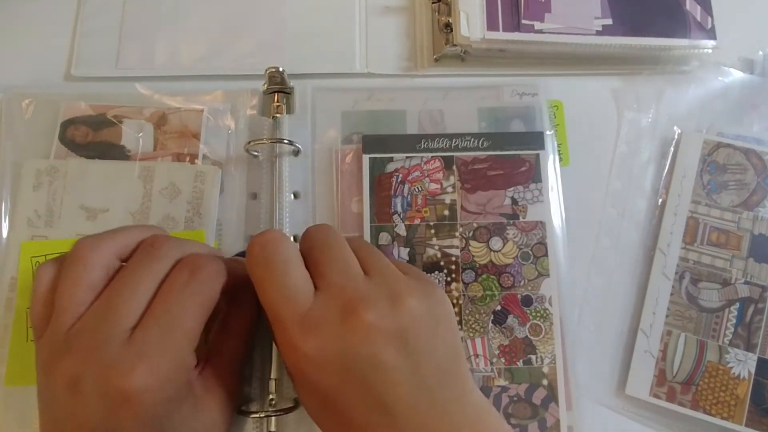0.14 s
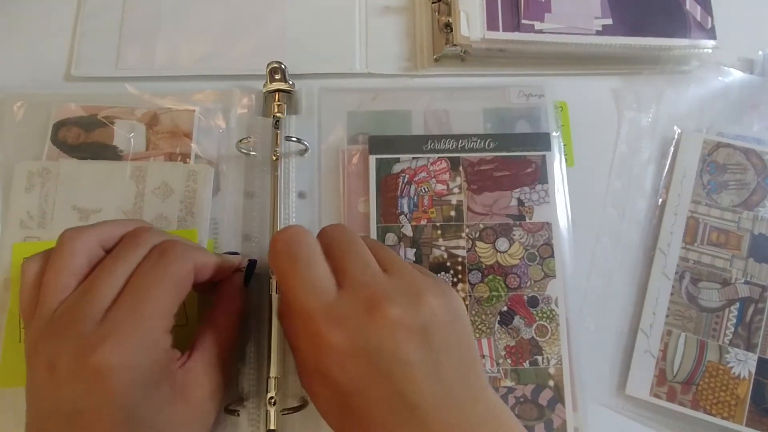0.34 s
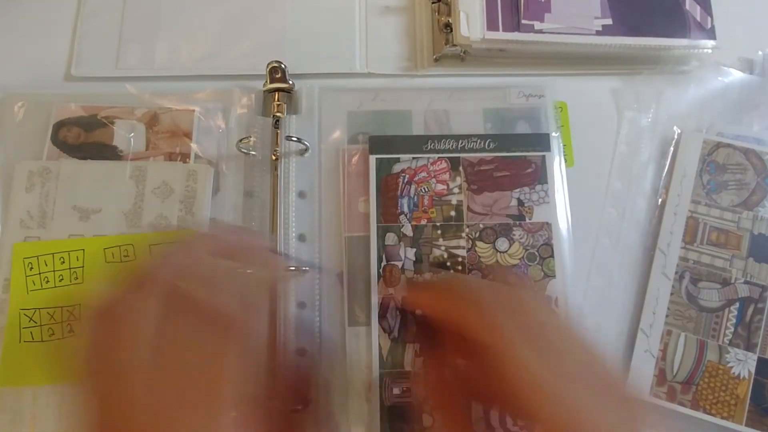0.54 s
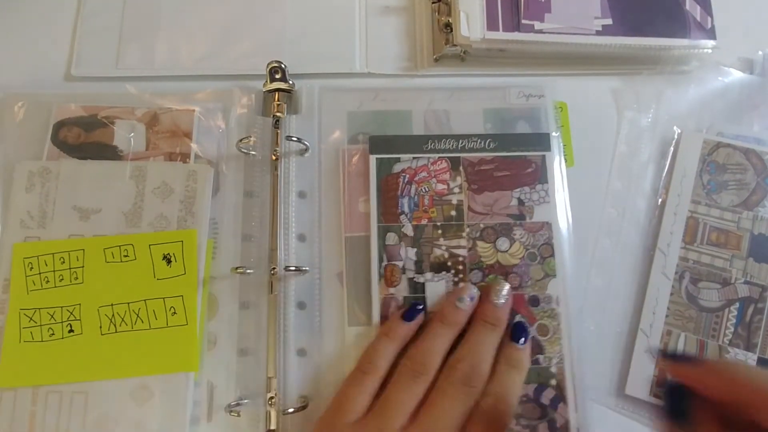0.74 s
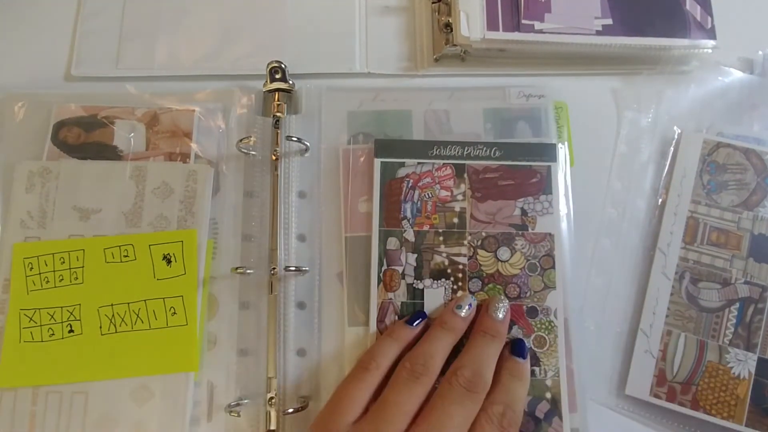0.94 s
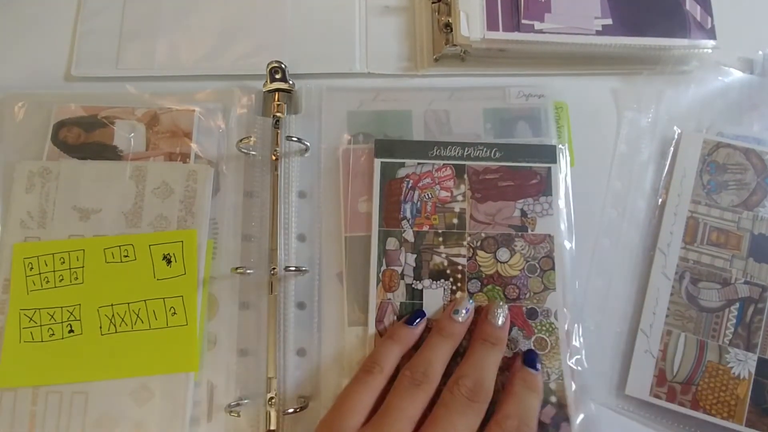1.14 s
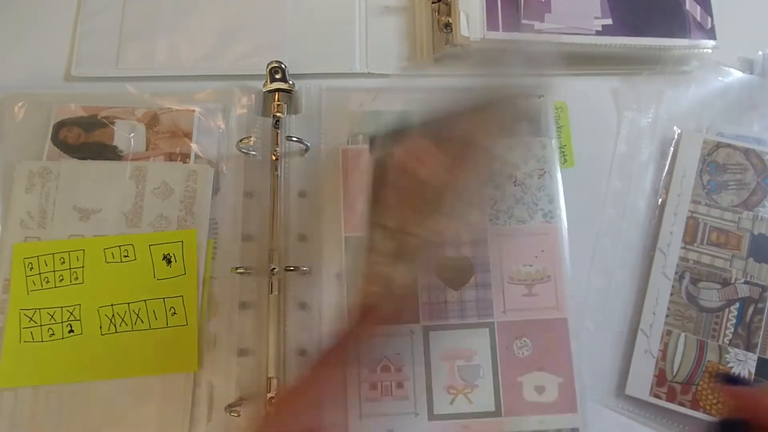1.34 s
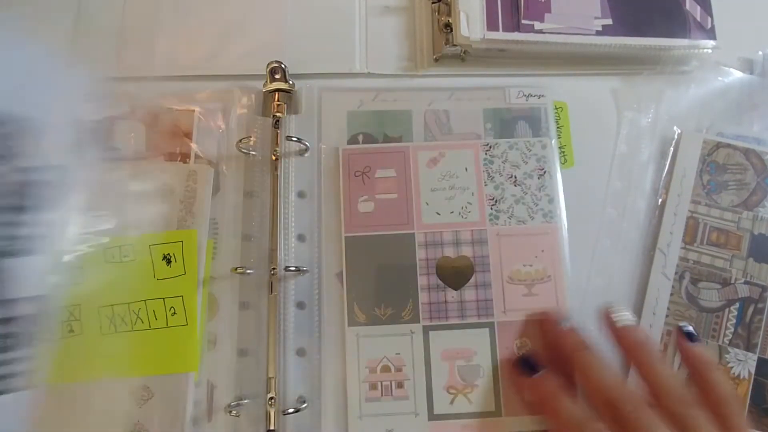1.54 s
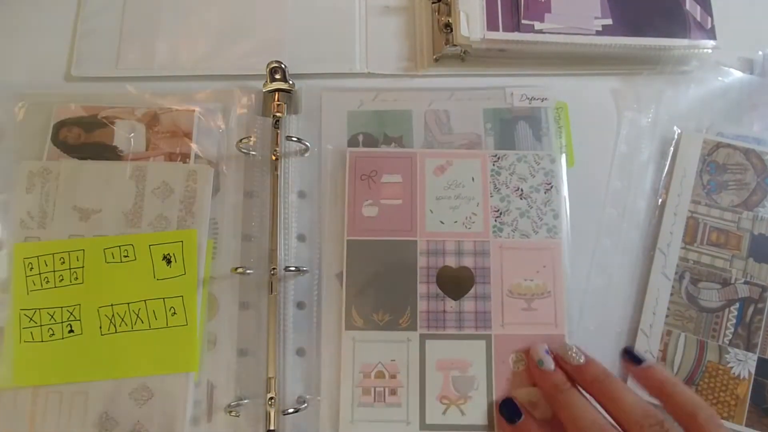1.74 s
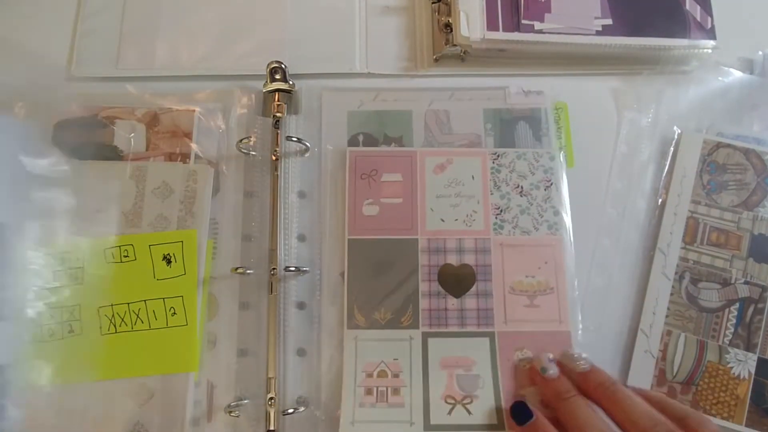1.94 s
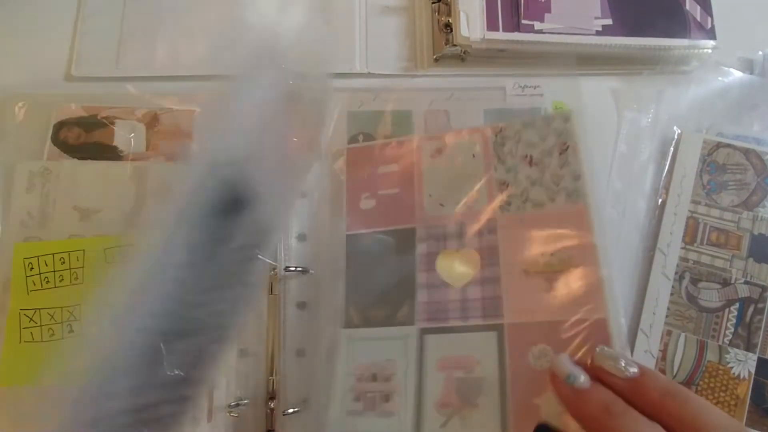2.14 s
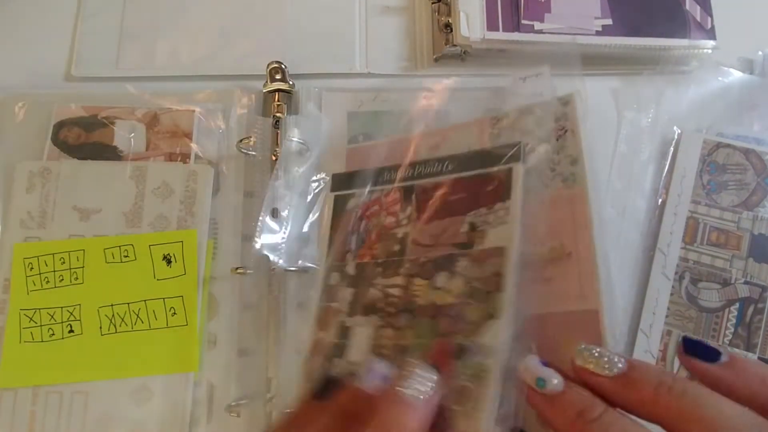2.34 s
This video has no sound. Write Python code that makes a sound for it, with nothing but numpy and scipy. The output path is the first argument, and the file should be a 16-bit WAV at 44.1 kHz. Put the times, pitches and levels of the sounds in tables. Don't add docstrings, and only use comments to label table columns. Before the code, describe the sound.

Ring binder snaps shut with a loud metallic clack, then two plastic sleeves crackle as they turn

```python
import sys
import numpy as np
from scipy import signal
from scipy.fft import rfft, irfft
from scipy.io import wavfile
from scipy.ndimage import uniform_filter1d

SR = 44100
rng = np.random.default_rng(int(sys.argv[2]) if len(sys.argv) > 2 else 0)


def voltage_ratio(decibels):
    exponent = np.asarray(decibels, float) / 20
    return 10 ** exponent


def wav_out(sig):
    wavfile.write(sys.argv[1], SR, np.round(np.clip(np.atleast_2d(sig).T, -1, 1) * 32767).astype(np.int16))


N = 110250


def evened(x):
    return x / np.sqrt(np.mean(x ** 2) + 1e-20)


def smooth_noise(shape, samples):
    return evened(uniform_filter1d(rng.standard_normal(shape), samples))


def read(points, hz):
    f, value = np.transpose(points)
    return np.interp(np.log(hz + 1), np.log(f + 1), value)


def colour(x, gain):
    return irfft(rfft(x) * gain(np.fft.rfftfreq(x.shape[-1], 1 / SR)), x.shape[-1])


def add(mix, s, sound):
    part = mix[..., round(s * SR):][..., :sound.shape[-1]]
    part += sound[..., :part.shape[-1]]


def mode(x, hz, width):
    return signal.lfilter(*signal.iirpeak(min(hz, .49 * SR), hz / width, SR), x)


def double_mode(x, hz, width):
    return mode(mode(x, hz, width), hz, width)


# (frequency [Hz], width [Hz], level [dB])
HUM = [(57.4, 39, -44), (121.4, 81, -57), (294, 13, -60)]
# (frequency [Hz], level [dB])
FLOOR = [(20, -31), (40, -18.5), (90, -14), (250, -12.5), (400, -25), (1000, -35.5), (6000, -49),
         (16000, -40)]
FLOOR_DB, HUM_WAVER = -60, .33
LATE_START_S, LATE_HZ, LATE_DB, LATE_SWELL_DB_PER_S = 1.32, 219, -59.5, 6.5


def background():
    noise, t = rng.standard_normal((2, N)), np.arange(N) / SR
    hum = np.zeros((2, N))
    for hz, width, db in HUM:
        waver = evened(double_mode(noise, hz, width))
        hum += voltage_ratio(db) * (np.sin(2 * np.pi * hz * t) + HUM_WAVER * waver)
    since = t - LATE_START_S
    level = voltage_ratio(LATE_DB + LATE_SWELL_DB_PER_S * since) * np.clip(since / 0.04, 0, 1)
    waver = evened(mode(mode(noise, LATE_HZ, 20), LATE_HZ, 5.4))
    hum += level * (np.sin(2 * np.pi * LATE_HZ * t) + 0.47 * waver)
    hiss = colour(rng.standard_normal((2, N)), lambda f: voltage_ratio(read(FLOOR, f)))
    return hum + voltage_ratio(FLOOR_DB) * evened(hiss)


RING_DB, RING_Q = -9.5, 3.5


def burst(noise, db, tilt_db, ms, hz=None):
    seconds = np.arange(noise.shape[-1]) / SR
    t = seconds * 1000 / ms
    tilt_db = np.clip(tilt_db, -6, 6)
    x = evened(colour(noise, lambda f: voltage_ratio(tilt_db * np.log2((f + 300) / 3000)) * f ** 2 / (f ** 2 + 250 ** 2)))
    if hz:
        ring = evened(mode(noise, hz, hz / RING_Q)) + 0.9 * np.sin(2 * np.pi * hz * seconds)
        x = x + voltage_ratio(RING_DB) * ring
    x = x * t * np.exp(-t)
    return voltage_ratio(db - 3.0) * x / abs(x).max()


# (time [s], peak level [dB], tilt [dB/octave], length [ms])
BLOWS = [
    (.0001,-24.5,-8,3.6),
    (0.2021,-1.5,1.9,0.89),
    (0.2273,0.5,5,2.3),
    (0.2395,-20,5.5,4.3),
    (0.2466,2,3.5,1),
    (0.264,-7.5,1.6,2.9),
    (0.3763,-36,-7.5,2.2),
]


def blows():
    out = np.zeros((2, N))
    for s, db, tilt_db, ms in BLOWS:
        add(out, s, burst(rng.standard_normal((2, 2048)), db, tilt_db, ms))
    return out


# (frequency [Hz], width [Hz], level [dB])
SPINE = [(380,420,-9),(1570,260,-15.5),(2900,1300,-9),(4740,1800,-6.5),(8260,1500,-6.5),(13600,5700,-1)]
# (time [s], level [dB], t60 [s], ring frequency [Hz], ring level [dB])
RATTLES = [(.0001,-46.5,0.12,2040,12.5),(.2025,-25.5,0.3,840,-4.5),(0.2258,-17,0.31,2900,-15),(.23,-36,.15,1120,6),(.376,-55,0.17,899.3,9.5),(.4,-66.5,0.43,530,17.5),(0.455,-53.5,0.099,4000,-14),(.776,-60,0.124,4770,5),(1.555,-62.5,0.16,8260,8),(1.748,-58.5,0.13,7100,-3),(1.82,-59,0.11,4750,0.5)]
RATTLE_RING_Q, TREBLE_DAMPING, BASS_DAMPING = 1.7, 0.083, 0.34


def rattles():
    out, t = np.zeros((2, N)), np.arange(SR // 2) / SR
    for s, db, t60, ring_hz, ring_db in RATTLES:
        noise = rng.standard_normal((2, len(t))) * voltage_ratio(1.1 * smooth_noise(len(t), 150))
        bands = np.zeros_like(noise)
        for hz, width, band_db in SPINE:
            damping = TREBLE_DAMPING * max(np.log2(hz / 6000), 0) + BASS_DAMPING * (hz < 2000)
            bands += voltage_ratio(band_db - 60 * t / t60 * damping) * mode(noise, hz, width) / np.sqrt(width)
        ring = evened(double_mode(noise, ring_hz, ring_hz / RATTLE_RING_Q))
        decay = voltage_ratio(db - 60 * t / t60) * np.minimum(t / 0.0011, 1)
        add(out, s, decay * (evened(bands) + voltage_ratio(ring_db) * ring))
    return out


# (time [s], peak level [dB], ring frequency [Hz], tilt [dB/octave])
TOUCHES = [
    (0.109,-37.5,2783,-3),
    (.7765,-41.5,4710,-1),
    (1.045,-37.5,7030,0.5),
    (1.062,-21,6780,1.5),
    (1.076,-19.5,5460,3),
    (1.848,-25.5,8750,14),
    (1.926,-34.5,7240,0.5),
]
FIRST = [(1.213,-20,1193,-8),(1.2150,-8.5,1360,-3),(1.2218,-9,7500,0),(1.2253,-11.5,4673,-1.5),(1.2359,-13.5,7550,12),(1.2436,-8,6560,-0.7),(1.2534,-17,7670,0),(1.2636,-21,7650,-2),(1.289,-25,7500,4),(1.3002,-17,2500,-0.5),(1.3126,-23,7710,1.5),(1.319,-5,7750,0.3),(1.322,-9,5900,3.5),(1.334,-19.5,3000,-3),(1.362,-1,5740,0.75),(1.3630,-1,6600,4.5),(1.3657,-9,7510,-3),(1.3696,-13,5550,-0.5),(1.3784,-17,6530,3.5),(1.398,-18.5,6050,-1.5),(1.4424,-23,5950,-2),(1.445,-19,530,-2),(1.448,-26,5860,4.5),(1.4655,-31,6900,6),(1.47,-12.5,5400,5),(1.473,-27.5,6860,1),(1.4962,-23.5,7610,1),(1.5062,-26,6950,-15.5),(1.5125,-17.5,12000,2)]
SECOND = [(1.9718,-11,7410,3),(1.9741,-8.5,7250,-2.5),(2.018,-23,3130,-7),(2.0442,-5.5,3670,-10),(2.0457,-9.5,850,-3.5),(2.049,-20.5,1612,-6.5),(2.072,-18.5,3020,-9.5),(2.077,-17.5,2740,-1),(2.082,-11,7510,7),(2.104,-13.5,7750,-2),(2.1135,-21,7800,-5.5),(2.168,-22,1220,-3),(2.177,-18.5,2360,-9.5),(2.194,-20,1100,0.5),(2.2255,-4,4600,0.5),(2.228,-12,1800,2.5),(2.237,-10.5,7850,7),(2.2463,-7.5,4890,3.5),(2.262,-15.5,987.4,6),(2.268,-16,4065,0.5),(2.285,-14,2596,-0.65),(2.312,-19,1460,13),(2.323,-20,3460,0.5),(2.3378,-30,4140,2),(2.384,-26.5,910,-6),(2.388,-22,3400,-4.5),(2.398,-29,982,-4),(2.411,-30,900,-9),(2.4549,-19.5,1536,-3),(2.4839,-25.5,7380,-4.5)]
SNAP_MS, SNAP_CYCLES, TOUCH_TOP_HZ = 0.44, .8, 12000


def snaps():
    out = np.zeros((2, N))
    for k, (s, db, hz, tilt_db) in enumerate(TOUCHES + FIRST + SECOND):
        ms = SNAP_MS + SNAP_CYCLES * 1000 / hz
        noise = rng.standard_normal((2, 1024))
        if k < len(TOUCHES):
            noise = colour(noise, lambda f: 1 / (1 + (f / TOUCH_TOP_HZ) ** 6))
        add(out, s - ms / 2000, burst(noise, db, tilt_db, ms, hz))
    return out


# (start [s], length [s], level [dB], band frequency [Hz])
SLIDES = [(0.169,.02,-63.5,850),(0.821,0.087,-65,6540),(0.927,0.048,-68,5780),(1.062,0.027,-66,5950),(1.205,0.017,-35,2900),(1.36,0.066,-34,6260),(1.55,.06,-59,13900),(1.745,.05,-61,14000),(1.949,.04,-44,7160),(1.96,.18,-48.5,13990),(2.023,.03,-42.5,3400),(2.066,.025,-42.5,3000),(2.11,0.016,-48,3930),(2.167,.04,-46,12000),(2.291,.09,-44,6500),(2.378,0.036,-59,2960),(2.46,.05,-49.5,6200)]
SLIDE_Q, SLIDE_SKEW = 0.75, 0.77


def slides():
    out = np.zeros((2, N))
    for s, length, db, hz in SLIDES:
        t = np.arange(0, length, 1 / SR)
        hiss = evened(double_mode(rng.standard_normal((2, len(t))), hz, hz / SLIDE_Q))
        add(out, s, voltage_ratio(db) * np.sin(np.pi * (t / length) ** SLIDE_SKEW) * hiss)
    return out


# (time [s], peak level [dB], frequency [Hz], t60 [s])
THUDS = [(.2024, -19, 520, 0.0083), (.228, -31.5, 85.5, 0.47), (.234, -22.5, 125, 0.2),
         (.375, -61, 1555, 0.54), (.3755, -51, 2400, 0.057), (.376, -30, 120, 0.046),
         (1.21, -30, 1145, 0.072), (1.468, -22, 220, .02), (1.493, -26, 123, 0.099),
         (1.505, -34, 485, 0.032), (1.512, -35, 212, 0.1), (2.045, -23, 323, 0.038),
         (2.08, -35, 312, 0.057), (2.11, -34.5, 108, 0.15), (2.177, -25, 368, .015),
         (2.227, -31.5, 408, 0.036), (2.355, -45, 214, 0.23), (2.357, -31.5, 630, .02)]
THUD_WOBBLE = .5


def thuds():
    out, t = np.zeros((2, N)), np.arange(SR // 3) / SR
    for s, db, hz, t60 in THUDS:
        wobble = 1 + THUD_WOBBLE * np.minimum(t * hz / 8, 1) * smooth_noise((2, len(t)), 600)
        add(out, s, voltage_ratio(db - 60 * t / t60) * wobble * np.sin(2 * np.pi * hz * t))
    return out


# (frequency [Hz], level [dB])
SQUEAL = [(7015, -17.5), (13960, -22.5)]
SQUEAL_START_S, SQUEAL_END_S, SQUEAL_FADE_DB = .2030, .2270, -4.5


def squeal():
    out, t = np.zeros((2, N)), np.arange(0, SQUEAL_END_S - SQUEAL_START_S, 1 / SR)
    shape = np.minimum(np.minimum(t, t[::-1]) / 0.0012, 1) * voltage_ratio(SQUEAL_FADE_DB * t / t[-1])
    tones = sum(voltage_ratio(db - 1.5) * np.sin(2 * np.pi * hz * t) for hz, db in SQUEAL)
    add(out, SQUEAL_START_S, shape * tones)
    return out


PATCH_DB = 4


def patchy(x):
    z = signal.stft(x, nperseg=256)[2]
    patches = uniform_filter1d(rng.standard_normal(z.shape[1:]), size=10, axis=0)
    patches = evened(uniform_filter1d(patches, size=10, axis=1))
    return signal.istft(z * voltage_ratio(PATCH_DB * patches), nperseg=256)[1][:, :N]


# (time [s], rustle level [dB])
EFFORT = [(.77, -76), (.86, -63.5), (0.951, -67), (1.07, -62), (1.129, -90), (1.188, -49.5), (1.224, -30.5),
          (1.3, -68), (1.38, -41), (1.5, -32), (1.56, -80), (1.7, -74), (1.927, -58), (1.988, -36),
          (2.08, -37.5), (2.15, -49), (2.266, -30), (2.5, -56.5)]
# (frequency [Hz], level [dB])
FILM = [(150, 5), (1500, 5), (16000, -2.5)]
GRAINS_PER_S, GRAIN_SPREAD_DB, CLUMP_DB, SLIDE_DB = 1600, 3.2, 3, -1


def rustle():
    level = voltage_ratio(np.interp(np.arange(N) / SR, *np.transpose(EFFORT)))
    clumps = voltage_ratio(CLUMP_DB * smooth_noise(N, 700))
    struck = rng.random((2, N)) < clumps * GRAINS_PER_S / SR
    size = struck * voltage_ratio(GRAIN_SPREAD_DB * np.minimum(rng.exponential(1, (2, N)), 5))
    kind = rng.integers(0, 16, (2, N))
    crackle, t = np.zeros((2, N)), np.arange(400) / SR
    for k, hz in enumerate(np.geomspace(300, 15000, 16)):
        grain = hz * np.sin(2 * np.pi * hz * t) * np.exp(-t * hz / 2.1)
        crackle += signal.oaconvolve(size * (kind == k), grain[None], axes=1)[:, :N]
    flicker = voltage_ratio(3.4 * smooth_noise(N, 500))
    mix = evened(crackle) + voltage_ratio(SLIDE_DB) * flicker * rng.standard_normal((2, N))
    return voltage_ratio(-4.5) * level * evened(colour(patchy(mix), lambda f: voltage_ratio(read(FILM, f))))


# (frequency [Hz], t60 [s])
ROOM = [(400, 0.29), (2000, 0.22), (8000, 0.19), (16000, 0.056)]


def room(x):
    taps = np.zeros((2, SR // 2))
    at = np.arange(100, SR // 2 - 20, 20)
    at = at + rng.integers(0, 20, (2, len(at)))
    taps[np.arange(2)[:, None], at] = rng.choice([-1., 1.], at.shape)
    hz, t, z = signal.stft(taps, SR, nperseg=256)
    tail = signal.istft(z * voltage_ratio(-60 * t / read(ROOM, hz)[:, None]), SR, nperseg=256)[1]
    return signal.fftconvolve(x[None], tail / np.linalg.norm(tail[0]), axes=1)[:, :N]


# (frequency [Hz], coherence [0-1])
SAME = [(100, 0.93), (350, 0.9), (1000, 0.3), (3000, 0.083), (12000, 0.18)]
# (frequency [Hz], level [dB])
TILT = [(700, 0), (2800, 2), (5600, -2), (9500, 2), (14000, -2)]


def ports(x, left_db, lead_s):
    def same(f):
        return np.clip(read(SAME, f), 0, 1)

    shared = colour(x[0], lambda f: same(f) * np.exp(-2j * np.pi * f * lead_s))
    own = colour(x[1], lambda f: np.sqrt(1 - same(f) ** 2))
    right = colour(shared + own, lambda f: voltage_ratio(read(TILT, f)))
    return np.array([x[0] * voltage_ratio(left_db / 2), right / voltage_ratio(left_db / 2)])


LEFT_START_DB, LEFT_END_DB, LEFT_HUM_DB, BINDER_LEFT_DB = 5.5, 8.5, 6.5, 5.5
LEAD_S, HUM_LEAD_S = 0.0003207, .00005
ROOM_DB, BINDER_ROOM_DB = -14.5, -22


def scene():
    hum = background()
    steel = blows() + rattles() + squeal()
    film = snaps() + slides() + rustle()
    wet = room(voltage_ratio(ROOM_DB) * film.sum(0) + voltage_ratio(BINDER_ROOM_DB) * steel[0])
    hands = ports(film + wet + thuds(), np.linspace(LEFT_START_DB, LEFT_END_DB, N), LEAD_S)
    return hands + ports(steel, BINDER_LEFT_DB, LEAD_S) + ports(hum, LEFT_HUM_DB, HUM_LEAD_S)


def low_pass(x):
    return signal.sosfilt(signal.butter(12, 16950, fs=SR, output="sos"), x)


# (frequency [Hz], level [dB])
MIC = [(1500, 1.74), (3000, 4), (6000, 5), (7600, 9), (9200, -3), (10300, -13), (11800, -9.5), (15500, -1)]


def record(dry):
    heard = np.clip(colour(dry, lambda f: voltage_ratio(read(MIC, f))), -1, 1)

    def band(f):
        bass_cut = f ** 4 / (f ** 4 + 42 ** 4)
        return bass_cut * np.clip((16100 - f) / 250, .015 * (f < 16800), 1)

    return low_pass(colour(heard, band))


dry = scene()
out = record(dry)
wav_out(out)
```